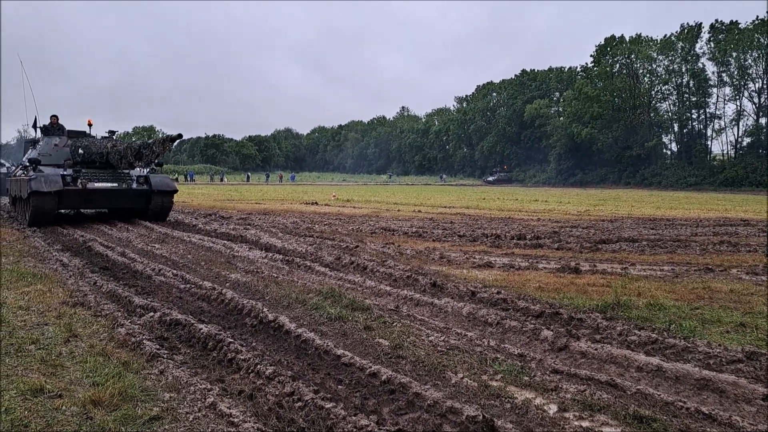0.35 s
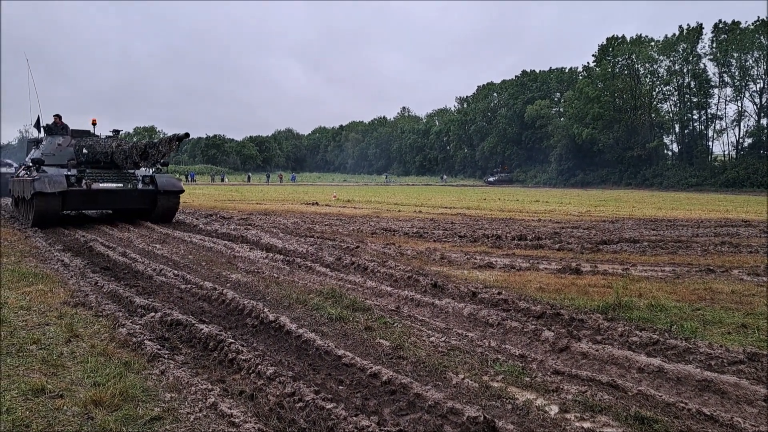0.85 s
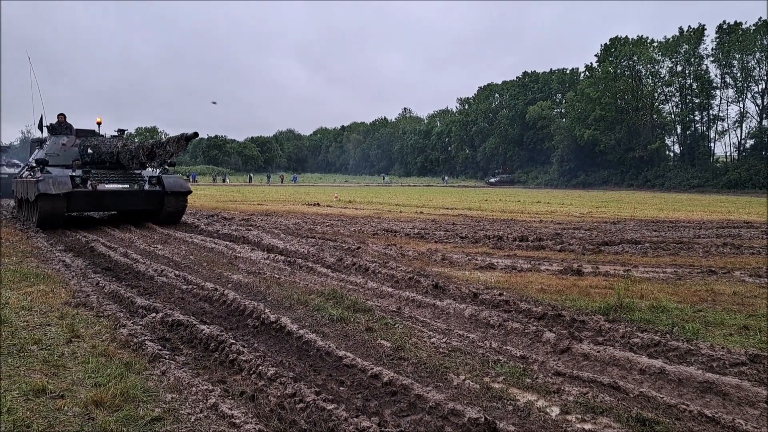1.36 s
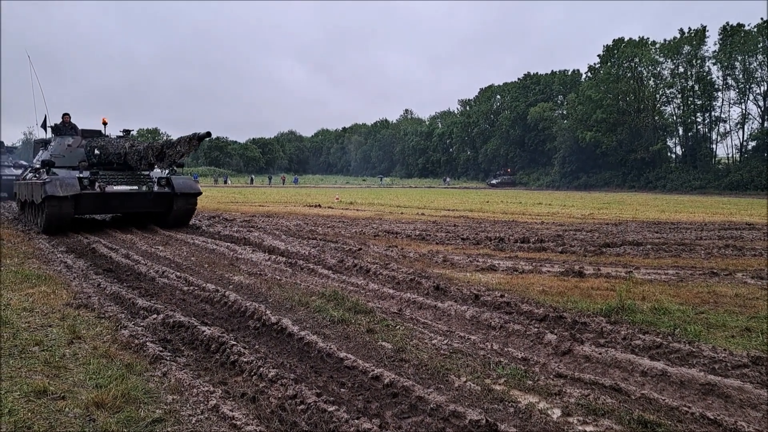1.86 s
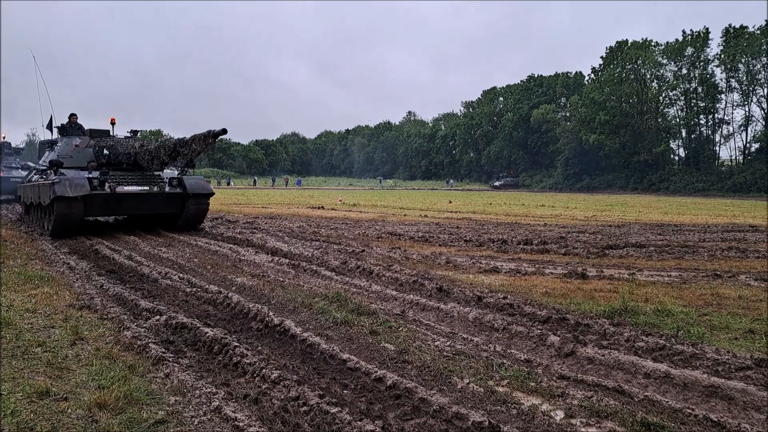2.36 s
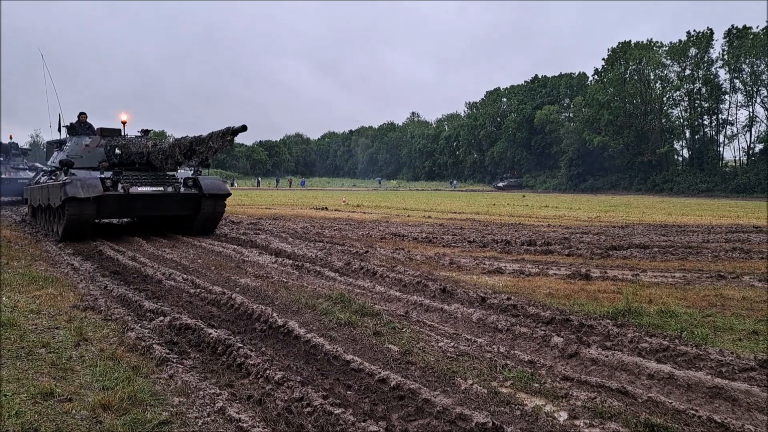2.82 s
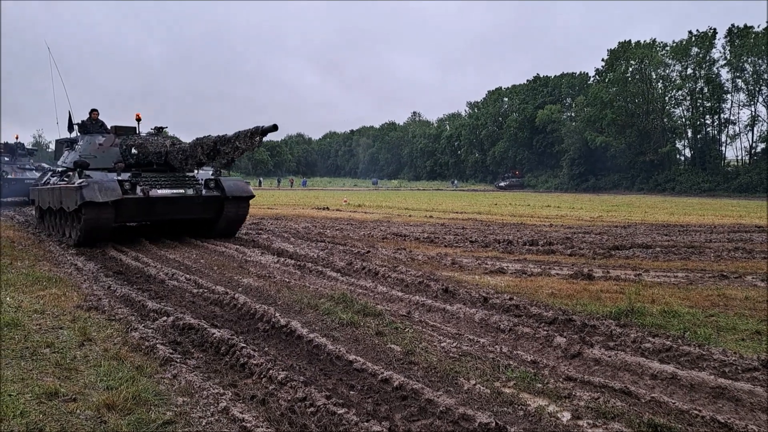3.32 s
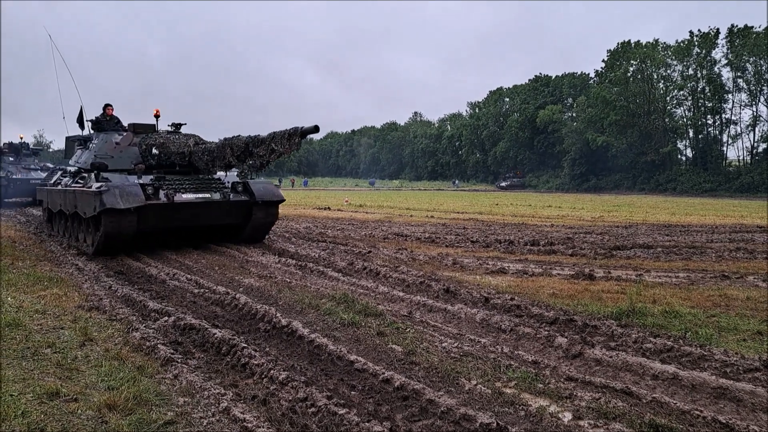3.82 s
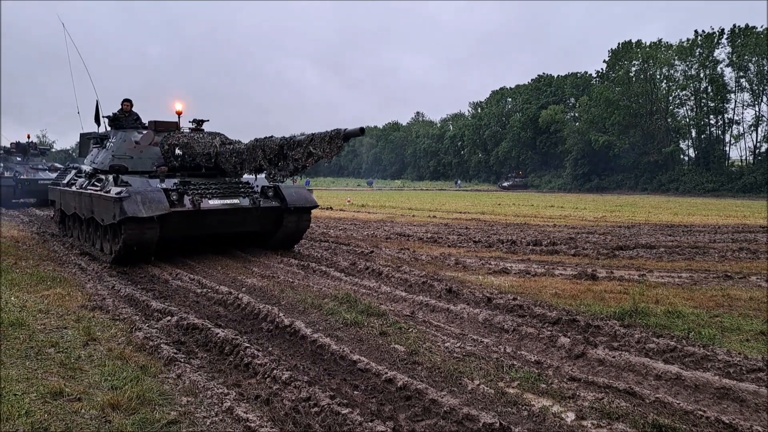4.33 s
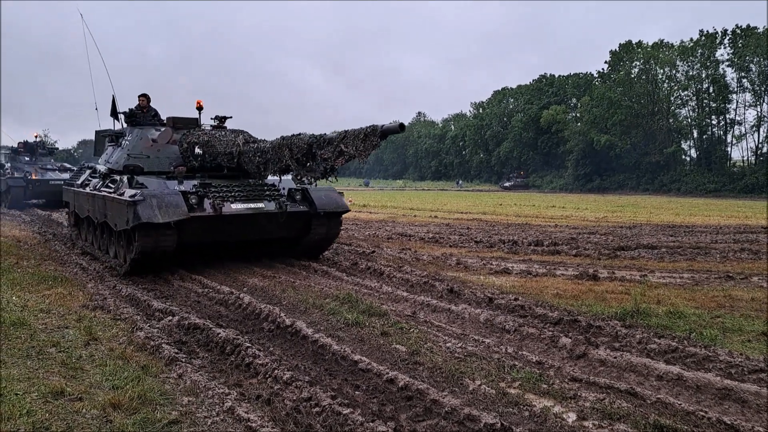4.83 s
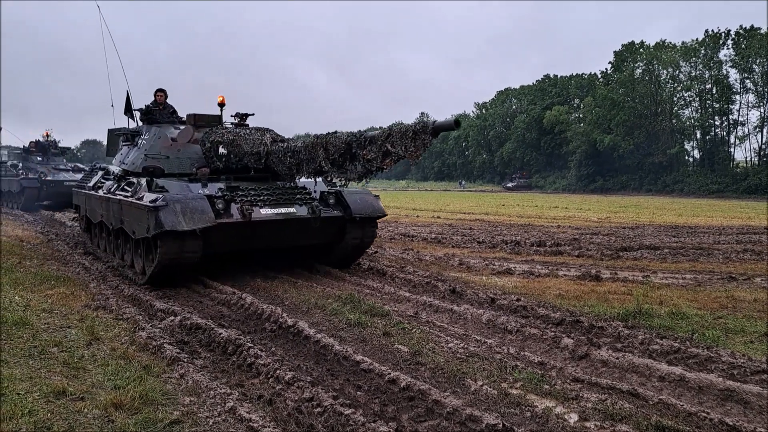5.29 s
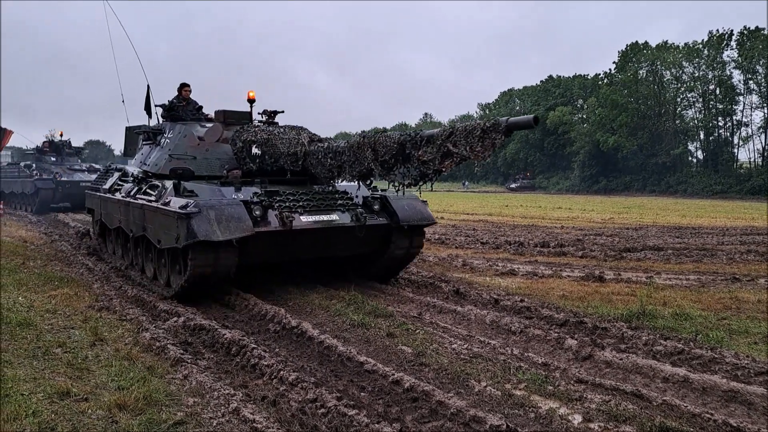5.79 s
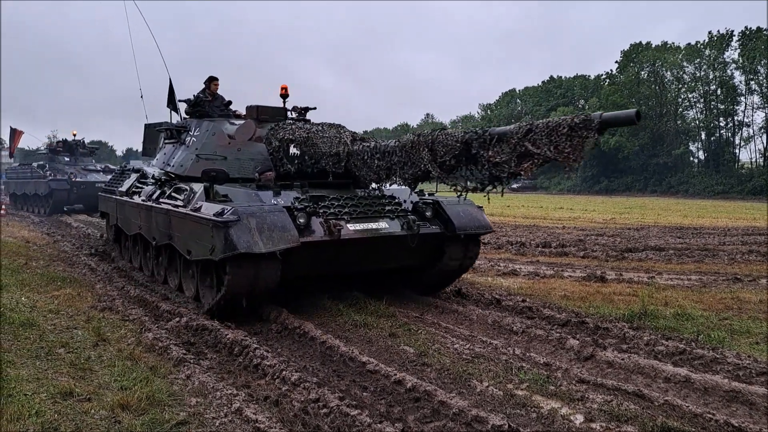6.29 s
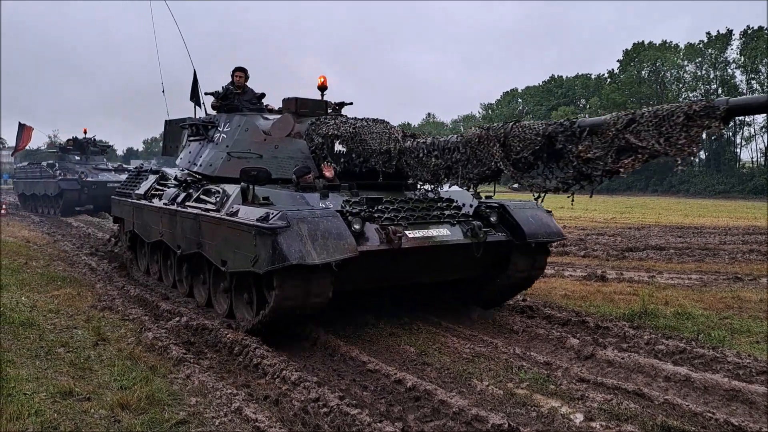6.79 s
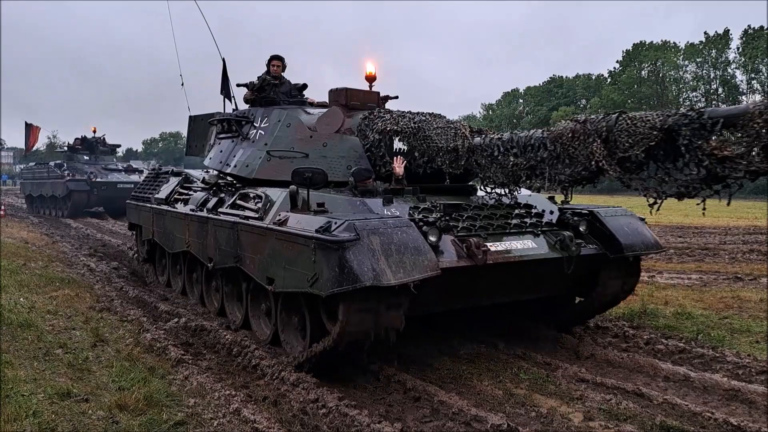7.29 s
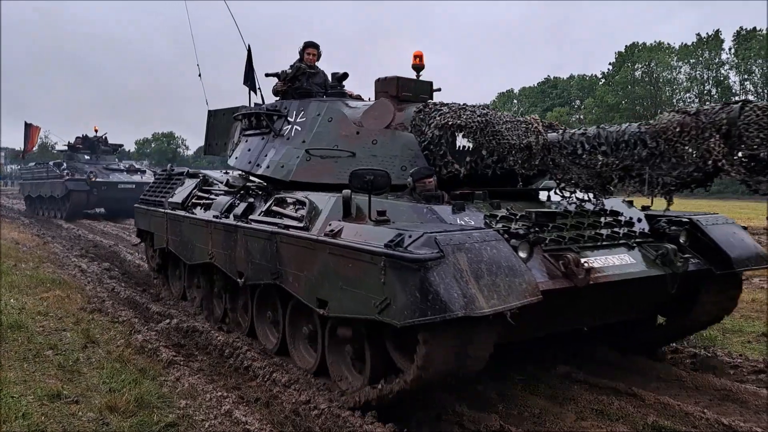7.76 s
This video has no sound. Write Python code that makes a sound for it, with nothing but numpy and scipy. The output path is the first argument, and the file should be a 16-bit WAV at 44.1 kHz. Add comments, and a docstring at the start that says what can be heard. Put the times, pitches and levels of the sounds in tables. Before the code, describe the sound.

Deep throbbing tank diesels in an open field: one surges and comes closer with gear clatter and brief panel rattle, another drones low behind.

```python
"""A near tracked vehicle idles beside a low diesel drone under broad roar in an open muddy field, then revs up,
eases and pulls again as it comes closer; from 1.9 s a second behind it revs and settles. Engines are sums of
firing orders; roar, gear clatter and cooling air are shaped noise; a supercharger whoosh trails engine
speed; track squeals are narrow noise, a loose panel rings when knocked. Two ports hear it from one side."""
import sys
import numpy as np
from scipy import signal
from scipy.fft import rfft, irfft, next_fast_len
from scipy.io import wavfile
from scipy.ndimage import uniform_filter1d, map_coordinates

SR = 44100
rng = np.random.default_rng(int(sys.argv[2]) if len(sys.argv) > 2 else 0)


def gain_from_db(level_db):
    """Convert decibel levels to linear amplitude factors (20 dB per decade)."""
    decades = np.asarray(level_db, float) / 20
    return 10 ** decades


def transcribe(u):
    """Save the signal u as a 16-bit wav file named by the first command-line argument.

    u: samples, shape (n,) or (channels, n), limited to [-1, 1]; the rate is SR.
    q: integer samples, one column per channel.
    """
    v = np.clip(np.atleast_2d(u).T, -1, 1)
    q = np.round(v * 32767).astype(np.int16)
    wavfile.write(sys.argv[1], SR, q)


N = 348390
APPROACH_S = 3.7  # the hull swings close from here on
REF_LOAD_DB, REF_FIRING_HZ = -34, 62


def unit(x):
    """Scaled to rms 1."""
    return x / np.sqrt(np.mean(x ** 2) + 1e-20)


def along(points, hz):
    """(hz, value) points read on a log frequency axis."""
    f, v = np.transpose(points)
    return np.interp(np.log(hz + 1), np.log(f + 1), v)


def curves(rows):
    """One value per sample for each column after the time."""
    s, *cols = np.transpose(rows)
    return [np.interp(np.arange(N) / SR, s, c) for c in cols]


def wobble(rate_hz):
    """A smooth random curve, rate_hz knots a second."""
    knots = rng.standard_normal(int(N * rate_hz / SR) + 4)
    return map_coordinates(knots, [np.arange(N) * rate_hz / SR])


def filtered(x, response):
    """x times a complex response of frequency."""
    m = next_fast_len(N + 8192)
    return irfft(rfft(x, m) * response(np.fft.rfftfreq(m, 1 / SR)), m)[..., :N]


def turns(hz):
    """Running phase (rad) of a frequency curve."""
    return 2 * np.pi * np.cumsum(hz) / SR


def tone(phase, drift_rad):
    """A sine of rms 1 whose phase wanders a little."""
    return np.sqrt(2) * np.sin(phase + rng.uniform(0, 2 * np.pi) + drift_rad * wobble(11))


def rush(spectrum, gate, patchy_db):
    """Turbulence: two gated noises with patches of random gain in time and frequency, rms 1."""
    z = signal.stft(gate * rng.standard_normal((2, N)), nperseg=512)[2]
    field = uniform_filter1d(rng.standard_normal(z.shape[1:]), 6, 0)
    field = uniform_filter1d(field, 12, 1)
    pair = signal.istft(z * gain_from_db(patchy_db * unit(field)), nperseg=512)[1][:, :N]
    return unit(filtered(pair, lambda hz: gain_from_db(along(spectrum, hz))))


def resonant(modes, x):
    """x through modes, each applied twice for steep skirts; white noise keeps its rms."""
    def shape(f):
        return sum(gain_from_db(db) * (1j * f * w / (c * c - f * f + 1j * f * w)) ** 2 for c, w, db in modes)
    return filtered(x, lambda f: shape(f) / np.sqrt(np.mean(np.abs(shape(f)) ** 2)))


def closing_s():
    """Seconds since the approach began."""
    return np.clip(np.arange(N) / SR - APPROACH_S, 0, None)


def bank_phase():
    """Phase of the firings of one bank, half the near engine's firing tone."""
    return turns(curves(NEAR)[0] / 2)


# how hard the drive works, as heard from here: start_s, load_db
LOAD = [(0, -37), (.25, -37), (.58, -38.5), (.74, -33.5), (1, -32), (1.25, -34), (1.5, -32.5), (1.75, -32),
        (2.25, -33.5), (2.5, -36.5), (2.75, -40), (3.25, -40), (3.5, -43.5), (4.25, -44), (4.75, -41.5),
        (5, -37), (5.5, -37), (6.1, -36), (6.5, -36.5), (7, -37), (7.9, -39.5)]
# how layers follow the engine: level_at_ref_db, db_per_load_db, db_per_octave_of_speed, db_per_s_of_approach
FOLLOW = {"roar": (-22.5, 1.05, -2.5, 0.5), "gears": (-37.5, .75, -2.5, -0.03),
          "clatter": (-36, 0.97, .1, 0.14), "air": (-47.5, 0.95, .3, 0.32), "blower": (-52.5, 1.4, -1, 0.9)}


def follows(name):
    """Level (dB) of a layer, from load, engine speed and approach."""
    ref_db, per_db, per_octave, per_s = FOLLOW[name]
    load_db = per_db * (curves(LOAD)[0] - REF_LOAD_DB)
    speed_db = per_octave * np.log2(curves(NEAR)[0] / REF_FIRING_HZ)
    return ref_db + load_db + speed_db + per_s * closing_s()


# idling drone at the start: start_s, pitch_hz, level_db, overtone_db
DRONE = [(0, 80.2, -42, -26), (.25, 78.9, -33.5, -31), (.5, 76.4, -31.5, -50), (1.25, 81.4, -32, -40),
         (1.6, 75.5, -37, -64), (1.9, 80, -88.5, -91)]


def idling_drone():
    """A wandering tone and one overtone at 1.72 times its pitch."""
    hz, level_db, over_db = curves(DRONE)
    phase = turns(hz)
    return gain_from_db(level_db) * tone(phase, drift_rad=0.17) + gain_from_db(over_db) * tone(1.72 * phase, drift_rad=0.98)


# engine behind: start_s, firing_hz, level_db
BEHIND = [(1.9, 42.73, -47), (2.02, 44.15, -37.5), (2.15, 48.81, -26.5), (2.4, 57.6, -10.5),
          (2.65, 66.45, -11), (2.9, 71.82, -9.5), (3.15, 75.97, -10), (3.52, 80.42, -10.5),
          (3.65, 78.44, -18.5), (3.78, 73, -25), (3.9, 68.86, -20), (4.28, 64.34, -21.5),
          (4.4, 62.53, -25.5), (4.65, 61.46, -20), (4.9, 64.12, -15), (5.28, 62.56, -13),
          (6.28, 60.33, -15.5), (6.78, 59.94, -13.5), (7.9, 59.96, -12.5)]
# its overtones: multiple_of_firing_tone, level_re_firing_tone_db
BEHIND_ORDERS = [(5 / 6, -30), (7 / 6, -22), (1.5, -28), (11 / 6, -28), (2.0, -19), (3.0, -32)]


def engine_behind():
    """Firing tone of the second engine with wavering orders around and above it."""
    hz, level_db = curves(BEHIND)
    phase = turns(hz)
    over = sum(gain_from_db(db + 1.7 * wobble(6.4)) * tone(k * phase, drift_rad=0.33) for k, db in BEHIND_ORDERS)
    started = np.arange(N) > BEHIND[0][0] * SR
    return gain_from_db(level_db + 0.24 * wobble(11)) * (tone(phase, drift_rad=0.099) + over) * started


# roar spectrum: pitch_hz, level_db_per_hz
ROAR = [(20, -25), (40, -9), (65, -0.5), (120, -3.5), (200, -2), (260, -4), (320, -8), (420, -14),
        (550, -24), (800, -49)]


def roar():
    """Low turbulent noise that follows the load."""
    return gain_from_db(follows("roar")) * rush(ROAR, 1, patchy_db=1.5)


# gear spectrum: pitch_hz, level_db_per_hz
GEARS = [(300, -26), (480, -7), (650, -3), (850, -5.5), (1050, -12.5), (1500, -44.5)]


def gears():
    """Mid-band gear noise that follows the load."""
    return gain_from_db(follows("gears")) * rush(GEARS, 1, patchy_db=1.0)


# clatter spectrum: pitch_hz, level_db_per_hz
CLATTER = [(600, -40), (950, -12), (1250, -1), (1700, -4.5), (2150, -5), (2500, -9.5), (3000, -12),
           (3400, -14.5), (3800, -15), (5000, -22.5), (8000, -60.5)]


def clatter():
    """Bright noise that pulses with the firings of one bank."""
    gate = gain_from_db(0.67 * np.cos(bank_phase()) + 0.41 * wobble(40))
    return gain_from_db(follows("clatter")) * rush(CLATTER, gate, patchy_db=1.0)


# cooling air spectrum: pitch_hz, level_db_per_hz
AIR = [(2500, -33), (3800, -3.5), (5000, 1), (5700, -1), (6600, -3.5), (8000, -12), (10000, -12.5),
       (12000, -11), (14000, -18.5), (15300, -25.5), (17000, -56.5)]


def cooling_air():
    """Treble hiss that flutters and pulses slightly with the firings of one bank."""
    gate = gain_from_db(0.33 * np.cos(bank_phase()) + .7 * wobble(71))
    return gain_from_db(follows("air") + .6 * wobble(8.4)) * rush(AIR, gate, patchy_db=2.0)


# squeals of the running gear as it starts to move: start_s, length_s, pitch_hz, level_db
SQUEALS = [(.6, 0.41, 2210, -43), (.78, 0.12, 3360, -44), (.8, 0.31, 2976, -45), (1.352, .25, 3040, -47),
           (1.8, 0.22, 2100, -44)]


def squeals():
    """Thin tones carried by slow noise, so they waver as they swell and fade."""
    edge_s, width_hz = 0.039, 23
    t = np.arange(N) / SR
    total = np.zeros((2, N))
    for start_s, length_s, hz, db in SQUEALS:
        grip = unit(filtered(rng.standard_normal((2, N)), lambda f: 1 / (1 + (f / width_hz) ** 2)))
        outside_s = np.clip(abs(t - start_s - length_s / 2) - length_s / 2, 0, None)
        total += gain_from_db(db) * np.exp(-(outside_s / edge_s) ** 2) * grip * np.cos(2 * np.pi * hz * t)
    return total


# supercharger bands: multiple_of_blade_tone, half_width_hz, level_db
BLOWER_BANDS = [(1.0, 230, 3), (2.0, 690, 0), (3.0, 500, -9)]


def blower():
    """Broad noise around the blade tones; the rotor trails engine speed."""
    blade_ratio, lag_s = 50.8, .65  # blade tone over firing tone; time constant of catching up
    engine_hz, keep = curves(NEAR)[0], np.exp(-1 / (lag_s * SR))
    trailing_hz = signal.lfilter([1 - keep], [1, -keep], engine_hz - engine_hz[0]) + engine_hz[0]
    phase = turns(blade_ratio * trailing_hz)
    bands = np.zeros((2, N))
    for k, width_hz, db in BLOWER_BANDS:
        band = unit(filtered(rng.standard_normal((2, N)), lambda f: 1 / (1 + (f / width_hz) ** 4)))
        bands += gain_from_db(db) * band * np.cos(k * phase)
    return gain_from_db(follows("blower") + [[1.5], [-1.5]]) * bands


# panel modes: pitch_hz, width_hz, level_db
PANEL = [(1480, 300, -12.5), (1670, 290, -5.5), (2074, 290, -1), (2760, 700, -12.5), (5300, 3100, -24.5)]
# hardest knocks on the panel: start_s, relative_db
KNOCKS = [(5.724, -26), (5.7799, -29), (5.7977, -32), (5.8573, -24.5), (5.914, -23.5), (5.9548, -27),
          (6.037, -25), (6.09, -28.5), (6.1209, -22), (6.14, -26), (6.293, -31), (6.316, -30),
          (6.369, -27.5)]


def rattle():
    """A loose panel is knocked by each firing of one bank, some cylinders harder than others."""
    buzz_s, buzz_db = 3.9, -50
    burst_s, strike_db, swell_s, burst_db, fade_db_per_s = 5.61, -38, 0.51, -32.5, 15
    t, bank = np.arange(N) / SR, bank_phase()
    knock = np.exp(-(bank % (2 * np.pi)) / 1.6) * gain_from_db(1.4 * np.cos(bank / 3) + 1.1 * wobble(45))
    s, db = np.transpose(KNOCKS)
    hard = np.bincount(np.round(s * SR).astype(int), gain_from_db(db - 3.0), N)
    hard = np.convolve(hard, np.exp(-np.arange(900) / SR / 0.0027))[:N]  # each chatters for milliseconds
    swell_db = np.interp(t, [burst_s, burst_s + swell_s], [strike_db, burst_db])
    fade_db = fade_db_per_s * np.clip(t - burst_s - swell_s, 0, None)
    burst = gain_from_db(swell_db - fade_db) * np.clip((t - burst_s) / 0.18, 0, 1)
    buzz = gain_from_db(buzz_db) * np.clip((t - buzz_s) / .2, 0, 1)
    shake = (burst + buzz) * unit(knock + 0.88)
    return resonant(PANEL, (shake + hard) * rng.standard_normal((2, N)))


# near engine: start_s, firing_hz (order 6 of the cycle), exhaust_db, lope (-2..1), unevenness (-3..1)
NEAR = [(0.0, 65.0, -44, 0.5, 0.5), (0.32, 62.5, -40, 0.5, -0.3), (0.63, 60.4, -33.5, 0.3, -0.7),
        (0.95, 61.7, -29, 0.3, -2.3), (1.26, 62.2, -29, 0.9, -1.53), (1.42, 65.0, -30, 0.1, -1),
        (1.74, 77.8, -28, -0.73, -1.5), (2.05, 86.9, -26.5, -1.7, -1.5), (2.37, 93.6, -26.5, -1.62, -2.1),
        (2.69, 98.1, -31.6, -1.63, -1.36), (3.0, 97.8, -33.5, -1.41, -1.54), (3.3, 99.5, -33.5, -1, -1.3),
        (3.48, 95.3, -37, -1.4, -0.58), (3.79, 87.8, -37.5, -1.34, -2.5), (4.27, 90.4, -36, -0.55, -3.0),
        (4.74, 94.8, -33, -0.63, -2), (5.21, 100.7, -29.5, -1.25, -0.72), (5.69, 102.5, -31.5, -0.2, 0.37),
        (6.16, 106.3, -30.5, -0.74, 0.33), (6.64, 107.6, -31.5, -1, 0), (7.11, 109.9, -34.5, -1.24, 0.13),
        (7.43, 110.3, -30, -0.81, -0.8), (7.6, 108.7, -36.5, -1.7, -1), (7.9, 109.2, -32.5, -1.2, -0.1)]
# orders 3, 4 .. 30 of its cycle: strength_db, db_per_unit_lope, db_per_unit_unevenness
ORDERS = [(0.5, 4, 0.5), (-5, 1, 4.5), (-3.5, 1.5, 9), (11, -6, -0.9), (2, 0.3, 3.5), (-8.5, 1.5, -5.5),
          (5.5, 3, -1.8), (-10, 5, 3), (-2.5, -3, 4), (8.5, 0.73, 4.5), (-12.5, 2.5, 1.1), (2.2, -1.5, 5),
          (-.6, -2.4, -3.1), (-8, -5.5, 3.5), (-11, -3, -1.3), (-1.5, 2, 1.8), (-11.5, -1, 2),
          (-4.5, -7, 1.9), (-2.5, 0.4, -0.9), (-9.5, 1.5, -0.8), (-11, 3, 4), (-12, -1, 0.5),
          (-5.5, -4, -0.3), (-3, 3.3, -0.5), (-10, 4.5, -2), (-10.5, 2, 0), (-6, 1.5, -1.5),
          (-6.5, -3.5, -0.5)]
# what exhaust and ground let through of those orders: pitch_hz, gain_db
PIPE = [(30, -18.0), (45.0, -6), (62.0, 7.0), (75.0, 2.7), (90.0, -11), (105.0, -3.5), (150.0, 0),
        (165.0, 5.5), (180.0, 4.2), (195.0, 3), (210.0, 5.0), (225.0, 1.35), (240.0, 0.3), (255.0, -4.5),
        (290.0, -9.5), (320.0, -9.0), (480.0, -14), (560, -21)]


def near_exhaust():
    """Firing orders through the pipe; a loping or uneven beat moves strength between orders."""
    first_order, bank_order, flywheel_s = 3, 3, .12  # the flywheel smooths the speed
    steady, loose = (.8, .06), (2.8, .2)  # waver dB, drift rad: orders one bank makes alone, the others
    # orders above the knee thin out as load drops and as the hull swings in front of the outlets
    knee_order, thin_per_load_db, thin_db_per_s = 16, 1.1, 1.2
    hz, level_db, lope, uneven = curves(NEAR)
    hz = uniform_filter1d(hz, round(flywheel_s * SR), mode="nearest")
    cycle = turns(hz / 6)
    thin_db = thin_per_load_db * (curves(LOAD)[0] - REF_LOAD_DB) - thin_db_per_s * closing_s()
    total = np.zeros(N)
    for k, (db, lope_db, uneven_db) in enumerate(ORDERS, first_order):
        waver_db, drift_rad = loose if k % bank_order else steady
        beat_db = lope_db * lope + uneven_db * uneven
        pipe_db = along(PIPE, k * hz / 6) + thin_db * max(np.log2(k / knee_order), 0)
        total += gain_from_db(db + beat_db + pipe_db + waver_db * wobble(5)) * tone(k * cycle, drift_rad)
    return gain_from_db(level_db) * total


# likeness of the two ports: pitch_hz, likeness (0-1)
ALIKE = [(60, 1), (150, 1), (300, 0.63), (600, 0.68), (1200, 0.52), (2500, 0.16), (5000, 0.088),
         (12000, 0.23)]


def spread(pair):
    """Two unrelated signals mixed into a left and right of the given likeness."""
    def split(hz):
        angle_rad = np.arccos(np.clip(along(ALIKE, hz), 0, 1)) / 2
        return np.array([np.cos(angle_rad), np.sin(angle_rad)])
    mid, side = filtered(pair, split)
    return np.array([mid + side, mid - side])


def scene():
    """Exhaust tones arrive as one wave; the noisy parts come spread over the hulls and the ground."""
    tones = idling_drone() + engine_behind() + near_exhaust()
    noises = roar() + gears() + clatter() + cooling_air() + squeals() + blower() + rattle()
    return tones + spread(noises)


def roll_off(x):
    """The treble ends steeply here."""
    return signal.sosfilt(signal.butter(12, 15400, fs=SR, output="sos"), x)


# level difference of the ports: pitch_hz, left_minus_right_db
PORT_BALANCE = [(60, -.6), (250, -2.2), (700, -4), (1200, -4.5), (2100, -11.5), (2600, -7.5), (3800, -4.5),
                (4500, -2), (5700, -5), (7000, 1.87), (10500, 1.5), (12000, -3), (14000, 0.3)]
# delay of the left port: pitch_hz, delay_ms
LAG = [(60, 0.53), (200, 0.48), (450, 0.32), (1400, 0.26), (2100, 0.32)]


def record(dry):
    """Ports differ in level by pitch, the right ringing near 2.1, 5.7, 12 kHz; left hears later; soft limit."""
    side = np.array([[.5], [-.5]])

    def port(hz):
        late = np.exp(-2j * np.pi * hz * side * along(LAG, hz) / 1000)
        return gain_from_db(side * along(PORT_BALANCE, hz)) * late
    ports = filtered(dry, port)
    limited = ports / (1 + np.abs(ports / 1.04) ** 8) ** (1 / 8)
    return roll_off(limited)


dry = scene()
out = record(dry)
transcribe(out)
```